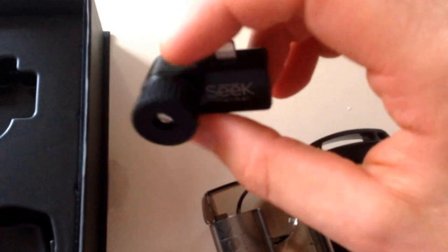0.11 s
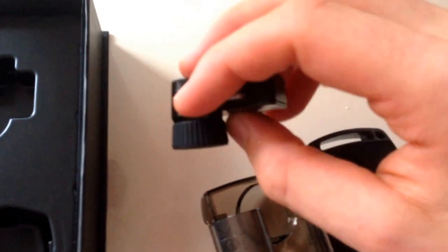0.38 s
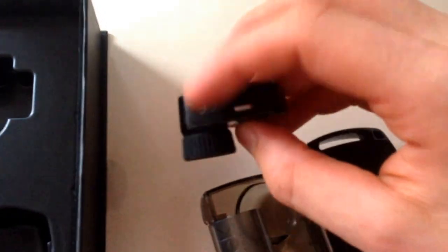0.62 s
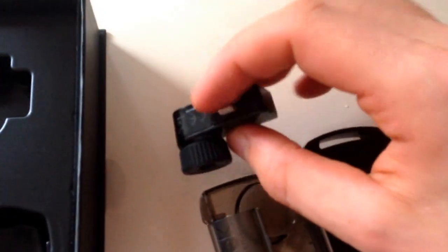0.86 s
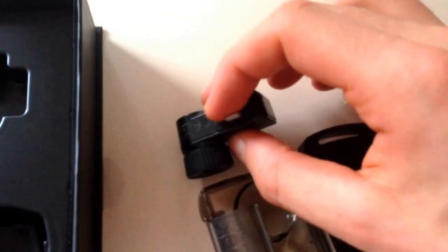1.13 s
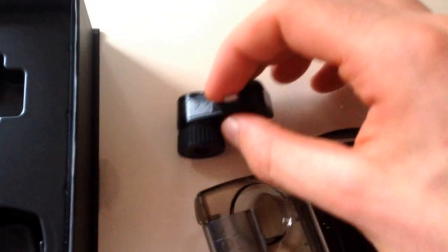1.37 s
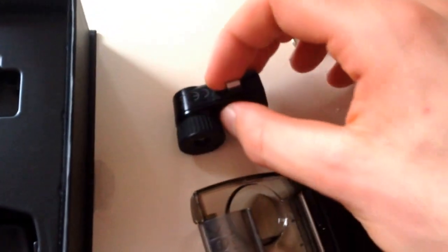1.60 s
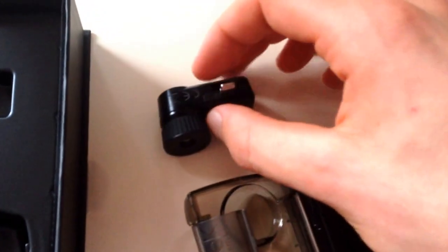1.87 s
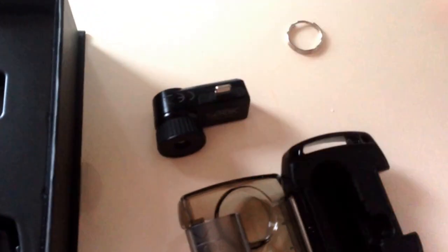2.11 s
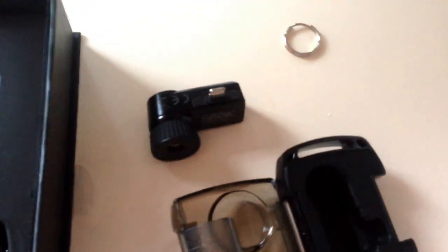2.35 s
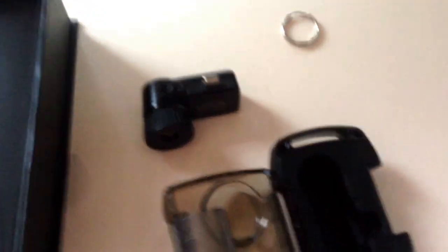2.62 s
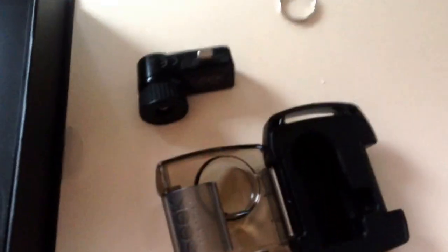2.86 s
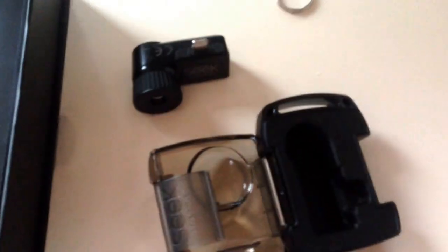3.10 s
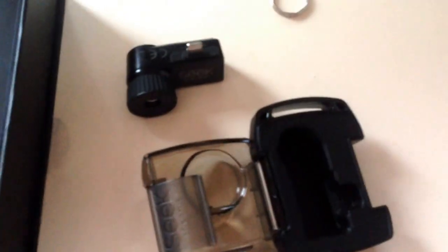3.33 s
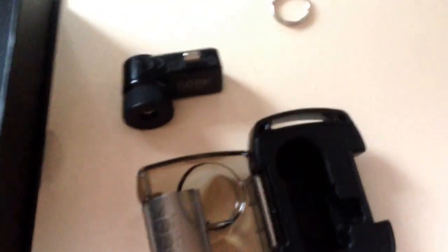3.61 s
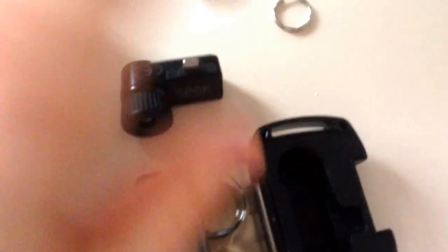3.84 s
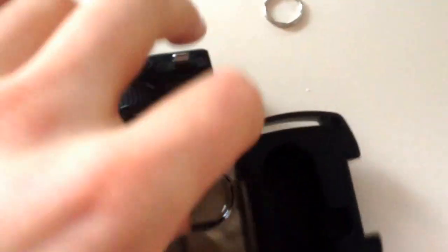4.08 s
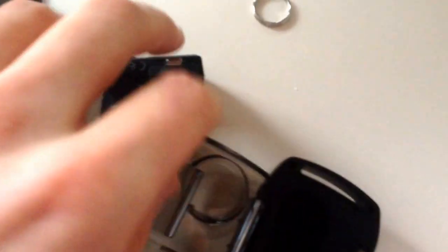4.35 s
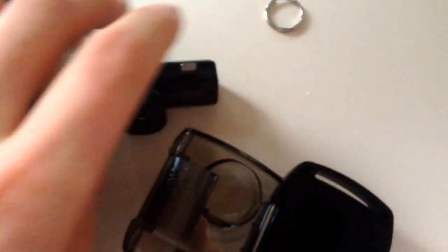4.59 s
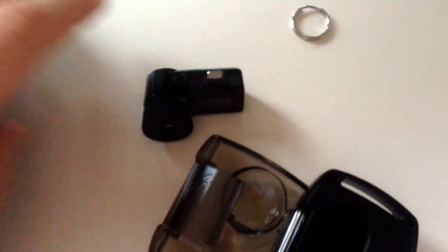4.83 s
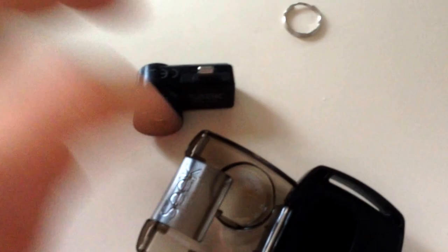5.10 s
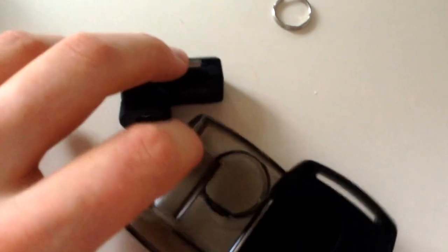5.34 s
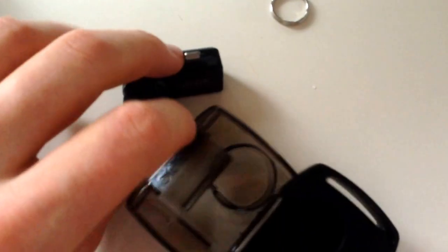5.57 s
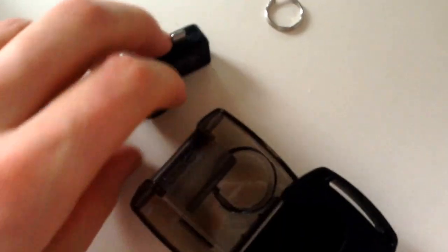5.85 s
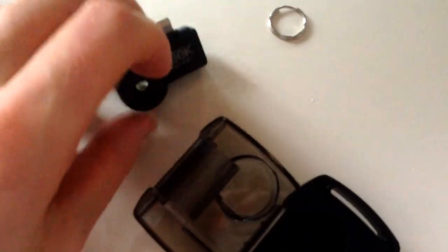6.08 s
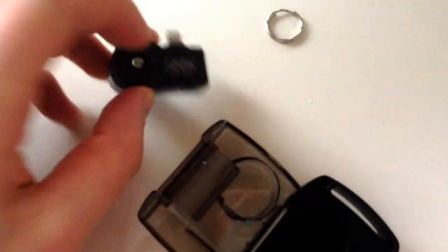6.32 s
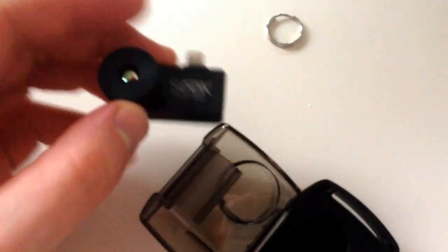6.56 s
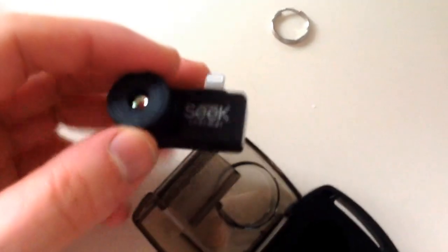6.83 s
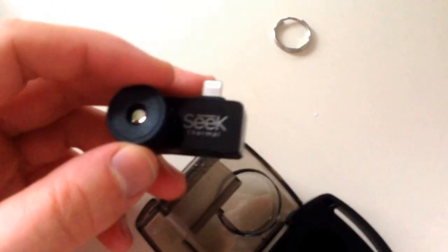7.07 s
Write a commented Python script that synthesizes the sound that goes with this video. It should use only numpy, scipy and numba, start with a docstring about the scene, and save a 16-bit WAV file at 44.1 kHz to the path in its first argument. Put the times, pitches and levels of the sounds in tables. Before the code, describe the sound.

A close phone microphone in a small room picks up a faint, wavering low hum around 200 Hz, soft rumble and steady hiss throughout. After a barely audible tap at 0.1 s, a small hard plastic gadget meets the table: clicks at about 1.15 and 1.3 s, a lighter one at 1.5, then the loudest clack with quick chatter at 1.83 s. Near silence follows, with dull low handling bumps around 2.7 to 3.1 s and faint ticks near 3.1, 3.5 and 3.8 s. From 4.17 to 4.4 s an open plastic case is knocked in a bright, rapid clatter while the hum briefly swells. A hand brushes the tabletop softly, strongest near 5.0 s. Taps resume at 5.3, with sharp clacks at 5.5 and 5.66 s and a rattle at 5.72 s. Small, hollow scrapes and rattles come near 5.9, 6.17 and 6.35 s, then only hum and hiss remain.

```python
"""A low hum wavers over rumble and the hiss of a phone microphone in a small room.
Fingers tap a small plastic gadget down on a table: each blow and its chatter excite damped modes.
Faint ticks are single damped rings, rattles excite one pitch, dragged parts slip and stick as jolts through
resonances, and the hand holding the phone thumps. Then an open plastic case is knocked, a hand brushes
the table as coloured noise, and the gadget is picked up with more taps, rattles and drags."""
import sys
import numpy as np
from scipy import signal
from scipy.fft import rfft, irfft, next_fast_len
from scipy.io import wavfile
from scipy.ndimage import uniform_filter1d
from numba import njit

SR = 44100
rng = np.random.default_rng(int(sys.argv[2]) if len(sys.argv) > 2 else 0)


def convert_level_to_amplitude(level_db):
    """Map a level in decibels to its linear amplitude factor."""
    exponent = np.asarray(level_db, float) / 20
    return 10 ** exponent


def dump(signal):
    """Clip the signal to [-1, 1] and save it as 16-bit WAV at the path in sys.argv[1]."""
    limited = np.clip(np.atleast_2d(signal).T, -1, 1)
    pcm = np.round(limited * 32767).astype(np.int16)
    wavfile.write(sys.argv[1], SR, pcm)


N = 317335
TIME = np.arange(N) / SR  # s

# wavering tone: time_s, mean_pitch_hz, mean_level_db
HUM = [(0.0, 195.3, -73), (0.12, 199.1, -79.5), (0.301, 197.9, -58), (1.138, 201, -57), (1.456, 213.3, -62),
       (2.04, 222, -66.5), (2.8, 209.1, -60.5), (2.9, 208.6, -76.5), (3.248, 203.5, -68.5),
       (3.32, 197.2, -63.5), (4.35, 199, -48.5), (4.43, 196.4, -62), (4.5, 198.1, -56.5),
       (5.829, 198, -57.5), (6.391, 200.4, -62.5), (6.469, 203.8, -67), (6.902, 198.7, -73.5),
       (6.999, 201.6, -59)]
# swell of the low rumble: time_s, level_db
RUMBLE = [(0.0, -65), (0.7, -62), (1.9, -58.5), (2.8, -61), (2.95, -66.5), (3.8, -61.5), (6.7, -61.5),
          (7.2, -65)]
# spectrum of the rumble: frequency_hz, relative_level_db
RUMBLE_COLOUR = [(25, -29), (60, -15), (95, -21), (130, 4.5), (155, -6), (178, 4.5), (200, 3), (230, -6.5),
                 (275, -5.5), (320, -10.5), (380, -19), (600, -23.5), (900, -41)]
# spectrum of the microphone hiss: frequency_hz, relative_level_db
HISS_COLOUR = [(240, -33), (400, -3.5), (511, -6), (914, -10.5), (1120, -12.5), (1590, -10), (2840, -13),
               (3210, -11), (13700, -14), (15500, -14.5)]
# bumps through the hand that holds the phone: centre_s, peak_db, pitch_hz
THUMPS = [(2.69, -62, 45.23), (2.9, -62, 59.7), (2.98, -58, 55), (3.12, -54.5, 63.8), (3.5, -67, 60),
          (5.511, -57.5, 64.4), (6.369, -64, 50)]
# blows of the gadget: start_s, shell_peak_db, table_peak_db, edge_peak_db, chatter_ms
TAPS = [(0.138, -49, -65, -54, 5.9), (1.057, -78, -74, -44.5, 11.4), (1.155, -42.5, -45, -67, 15),
        (1.1703, -28.5, -24, -43, 6.4), (1.3045, -21, -26.5, -60, 3.6), (1.333, -40, -67, -71, 9.8),
        (1.5152, -34.5, -31.5, -50, 10), (1.595, -47.5, -51, -76, 8.7), (1.64, -50, -48, -78, 14),
        (1.779, -57, -78, -66, 7.5), (1.83, -14.5, -25.5, -22.5, 10.9), (1.8535, -22, -34.5, -41, 11.3),
        (1.8675, -24.5, -31.5, -32, 9.2), (1.883, -35, -44, -49.5, 20), (3.497, -42.5, -56, -39.5, 9.2),
        (3.841, -50.5, -71, -45.5, 9.3), (4.657, -53.5, -49, -52.5, 11), (5.312, -48.5, -54, -38.5, 7.6),
        (5.355, -50, -52, -66, 20), (5.38, -31.5, -38, -41, 5.5), (5.455, -55, -61, -53.5, 12),
        (5.5073, -15.5, -22, -60, 5.5), (5.5295, -36, -43, -28.5, 6), (5.6595, -16.5, -24, -66, 4.7),
        (5.668, -27, -36, -35.5, 7.9), (5.721, -34, -30, -35, 15), (5.841, -52, -51, -85, 9),
        (6.132, -59, -50, -77, 6.1)]
# blows of the case: start_s, shell_peak_db, table_peak_db, edge_peak_db, chatter_ms
KNOCKS = [(4.109, -56.5, -73, -54, 13), (4.1741, -37, -83, -49, 3.1), (4.2115, -14.5, -29.5, -12.5, 4.4),
          (4.3078, -26, -34.5, -35.5, 23), (4.3278, -14.5, -17.5, -25.5, 9.7), (4.3635, -26, -21, -38, 4.5),
          (4.3658, -19, -45, -21.5, 8.8), (4.3735, -22, -25, -47, 10), (4.4065, -38.5, -39.5, -31, 5.2)]
# nominal modes of the table top: pitch_hz, level_db, longest_t60_s
TABLE_RING = [(336, -10, 0.11), (423, -2, 0.1), (617, 6, 0.07), (714, -4, 0.011), (940, 13, 0.066),
              (1042, 28.5, 0.019), (1225, 19, 0.021), (1350, 15.5, 0.013)]
# nominal modes of the gadget, shell then edges: pitch_hz, level_db, longest_t60_s
GADGET_RING = [(1640, 7, 0.005), (1905, -3.5, 0.036), (2100, 8, 0.0063), (2490, 10, 0.0107),
               (2810, 13.5, 0.013), (3160, 9, 0.01), (3580, 5, 0.006), (4401, 15, 0.005),
               (5100, 7.5, 0.0087), (5790, 13, 0.00292), (5910, 13, 0.002), (6810, 4, 0.0045),
               (7530, 10, 0.006), (8110, 17, 0.0013), (9400, -8, 0.0034), (11400, 17.5, 0.00089),
               (13620, -3.5, .002)]
# nominal modes of the case, shell then edges: pitch_hz, level_db, longest_t60_s
CASE_RING = [(1560, -6, 0.0097), (2415, 0, 0.02), (2980, -18, 0.0073), (3106, 8, .025),
             (3420, 16.5, 0.0047), (3900, -3, 0.0088), (4330, 8, 0.0074), (4980, 8, .008), (5800, -6, .006),
             (6800, -4, 0.0061), (7200, 8, 0.0061), (8150, 8, .005), (9400, 6, 0.004), (10800, 12, 0.0018),
             (13250, -10.5, .002)]
# push of a contact, softer on heavier bodies: table_ms, shell_ms, edges_ms
CONTACT_MS = (0.46, 0.25, 0.043)
# dry crack of the contact beside the modes: table_db, shell_db, edges_db
CRACK_DB = (43, 29, 22)
# below these each body is too small to radiate: table_contact_patch_hz, shell_hz, edges_hz
RADIATES_HZ = (305.3, 1300., 3920)
# faint ticks of one clear pitch: start_s, level_db, pitch_hz, t60_s
TICKS = [(.474, -57.5, 1040, 0.018), (3.104, -61, 784, 0.036), (3.167, -52.5, 860, 0.033),
         (3.255, -61, 570, 0.073), (3.255, -63.5, 1910, 0.097), (3.498, -42.5, 877, 0.042),
         (3.505, -45, 2480, 0.063), (3.508, -49, 835, 0.015), (3.509, -41.5, 5060, 0.019),
         (3.783, -56, 580, 0.059), (3.797, -62, 1330, 0.056), (4.01, -59.5, 1100, 0.057),
         (4.083, -58.5, 3580, .03), (4.655, -51, 686, 0.043)]
# a loose part buzzing on one pitch: start_s, peak_db, edge_peak_db, pitch_hz, length_ms
RATTLES = [(1.158, -41.5, -40.5, 3320, 6.3), (1.177, -29, -40, 2410, 4.4), (1.1798, -30, -33.5, 3000, 7.1),
           (1.5199, -27, -35, 3360, 3.7), (1.5222, -29, -33.5, 2220, 4.6), (1.807, -43.5, -77, 942, 3.3),
           (1.83, -39, -22.5, 1816, 3.86), (1.855, -29.5, -28.5, 1770, 4.4), (4.176, -42, -78, 3300, 12),
           (4.2108, -14.5, -38, 3300, 1.1), (4.2124, -19.5, -31, 2300, 2.0), (4.222, -38, -50, 1030, 21),
           (4.3096, -24.5, -52, 3256, 20.6), (4.3665, -18.5, -32, 3320, 5.4),
           (4.372, -23.5, -19.5, 2370, 7.5), (4.381, -31, -30.5, 3095, 4.1), (4.406, -36.5, -55, 1800, 3.3),
           (4.406, -27.5, -49, 3120, 4), (4.993, -41, -41, 737, 6.6), (5.51, -34.5, -39, 1350, 10),
           (5.511, -27, -32, 2920, 14), (5.725, -25, -35, 2440, 3.4), (5.729, -24, -25.5, 3030, 11),
           (5.869, -45, -63, 1580, 11), (6.164, -32.5, -61, 1065, 9.4), (6.165, -53, -58, 2800, 9.9),
           (6.179, -36.5, -58, 994, 5), (6.187, -39.5, -57, 1210, 5.9), (6.324, -44, -70, 1091, 26),
           (6.351, -40, -65, 1720, 25), (6.363, -36, -59, 1040, 8.4), (6.368, -40.5, -59, 2180, 22)]
# parts dragged on the table: firmest_contact_s, level_db, shell_level_db (relative), hollow_hz, fade_db_per_s
DRAGS = [(1.54, -73, -10, 950, 450), (1.61, -69.5, -25, 1300, 27), (1.78, -57, -14, 990, 66),
         (5.39, -62, -15, 940, 170), (5.76, -62, -28, 1230, 84), (5.881, -51, -12, 1480, 214),
         (6.177, -43, -23, 1120, 225), (6.34, -73, 4, 1108, 109), (6.368, -45, -3.5, 1100, 374)]
# hand brushing the table: time_s, mean_level_db
BRUSH = [(4.62, -69), (4.66, -69), (4.684, -74.5), (4.768, -61.5), (5.012, -53.5), (5.122, -71.5),
         (5.14, -93)]
# spectrum of the brushing: frequency_hz, relative_level_db
BRUSH_COLOUR = [(240, -46), (400, -11.5), (584, -3.5), (841, -7), (1410, -7), (1570, -11.5), (2060, -9),
                (2320, -15), (4070, -9.5), (15000, -25)]

HISS_DB, TOP_HZ = -67.5, 15700
THUMP_S, SHAKE_DB = 0.011, -84
SHELL_HZ, EDGE_HZ = 1450, 4400  # modes from here up belong to the shell, then to the edges
CHATTER_DB, CHATTER_DB_PER_MS = -32, 0.89  # the looser the part, the longer and stronger its chatter
RATTLE_CYCLES = 25  # to fall by 60 dB
DRAG_RISE_DB_PER_S = 589
HALO_HZ, HALO_WIDTH_HZ, HALO_DB, HALO_S = 2850, 390, -10.5, 0.0076


def curve(rows):
    """Linear interpolation of table columns over time; as good as silent (-150 dB) outside their span."""
    s, *columns = np.transpose(rows)
    return [np.interp(TIME, s, c, left=-150, right=-150) for c in columns]


def unit(x):
    """Normalisation to an rms of 1."""
    return x / np.sqrt(np.mean(x ** 2))


def noise(colour):
    """Spectral shaping: white noise weighted by (Hz, dB) points on a log-frequency axis, rms 1."""
    hz, db = np.transpose(colour)
    bins = np.fft.rfftfreq(N, 1 / SR) + 1
    gain = convert_level_to_amplitude(np.interp(np.log(bins), np.log(hz), db))
    return unit(irfft(rfft(rng.standard_normal(N)) * gain, N))


def walk(rate_hz):
    """Slow random fluctuation: noise averaged twice over 1 / rate_hz, rms 1."""
    k = int(SR / rate_hz)
    return unit(uniform_filter1d(uniform_filter1d(rng.standard_normal(N), k), k))


def grit(size, spread_db):
    """Impulsive excitation: tiny impacts of uneven but bounded size."""
    return rng.standard_normal(size) * convert_level_to_amplitude(spread_db * np.minimum(rng.exponential(size=size), 4))


def add(out, s, parts, peaks_db):
    """Superposition: the bodies enter at time s, each brought to its own peak level."""
    gains = convert_level_to_amplitude(peaks_db)[:, None] / np.abs(parts).max(axis=1, keepdims=True)
    sound = (parts * gains).sum(axis=0)
    start = int(s * SR)
    out[start:start + len(sound)] += sound


def hum():
    """Frequency and amplitude modulation: random wander gives a sinusoid its waver and rough skirt."""
    s, hz, db = np.transpose(HUM)
    pitch = np.interp(TIME, s, hz) + 1.52 * walk(8.1)
    phase = 2 * np.pi * np.cumsum(pitch) / SR
    level_db = np.interp(TIME, s, db) + 1.9 * walk(41) + 2.06 * walk(6.2)
    return np.sqrt(2) * convert_level_to_amplitude(level_db) * np.sin(phase)


def rumble():
    """Low-frequency coloured noise under a slow level envelope."""
    return convert_level_to_amplitude(curve(RUMBLE)[0]) * noise(RUMBLE_COLOUR)


def hiss():
    """Stationary coloured noise of the microphone."""
    return convert_level_to_amplitude(HISS_DB) * noise(HISS_COLOUR)


def thumps():
    """Structure-borne motion: Gaussian bumps of one or two cycles over the fluctuating shake of the hand."""
    bumps = sum(convert_level_to_amplitude(db) * np.exp(-((TIME - s) / THUMP_S) ** 2) * np.cos(2 * np.pi * hz * (TIME - s))
                for s, db, hz in THUMPS)
    shake = noise([(20, -11.5), (45, -6.5), (70, 1.0), (100, -1.5), (150, -62.0)])
    return bumps + convert_level_to_amplitude(SHAKE_DB + 6.7 * walk(3.3)) * shake


def rings(part, size=4096):
    """Modal responses of table, shell and edges; spot and grip shift each mode's share and pitch."""
    hz, db, t60 = np.transpose(TABLE_RING + part)[:, :, None]
    t = np.arange(size) / SR
    spot, grip = rng.standard_normal((2, len(hz), 1))
    gain, pitch = convert_level_to_amplitude(db + 2.5 * spot), hz * (1 + .015 * grip)
    # plastic and laminate damp strongly: a mode falls by 60 dB within about 28 cycles
    decay = 1000 ** (-t / np.minimum(t60, 28 / hz))
    modes = gain * np.sin(2 * np.pi * pitch * t) * decay
    body = np.digitize(hz[:, 0], [SHELL_HZ, EDGE_HZ])
    responses = []
    for k in range(3):
        push = np.sin(np.pi * np.minimum((t[:64] * 1000 + .01) / CONTACT_MS[k], 1)) ** 2
        impulse = modes[body == k].sum(axis=0) + convert_level_to_amplitude(CRACK_DB[k]) * (t == 0)
        pushed = np.convolve(impulse, push)[:size]
        radiation = signal.butter(3, RADIATES_HZ[k], "high", fs=SR, output="sos")
        responses.append(signal.sosfilt(radiation, pushed))
    return np.array(responses)


def blows(rows, part):
    """Impact excitation: a first blow, then a dying chatter of contacts, convolved with the three bodies."""
    out = np.zeros(N + 8192)
    t_ms = np.arange(4096) / SR * 1000
    for s, shell_db, table_db, edge_db, chatter_ms in rows:
        chatter_db = CHATTER_DB + CHATTER_DB_PER_MS * chatter_ms
        decay = np.exp(-(t_ms / max(chatter_ms, .3)) ** 0.83)
        chatter = convert_level_to_amplitude(chatter_db) * grit(size=4096, spread_db=3.5) * decay
        force = np.tile(chatter, (3, 1))
        force[:, 0] = 1  # the first blow
        add(out, s, signal.fftconvolve(rings(part), force, axes=1), [table_db, shell_db, edge_db])
    return out[:N]


def taps():
    """Impact of the gadget on the table, exciting the modes of both."""
    return blows(TAPS, GADGET_RING)


def ticks():
    """Free decay: each tick is a single damped sinusoid with a soft onset."""
    out = np.zeros(N)
    t = np.arange(8192) / SR
    onset = 1 - np.exp(-t / 0.00019)
    for s, level_db, hz, t60 in TICKS:
        start = int(s * SR)
        ring = np.sin(2 * np.pi * hz * t) * 1000 ** (-t / t60)
        out[start:start + len(t)] += convert_level_to_amplitude(level_db) * ring * onset
    return out


def rattles():
    """Repeated impact: small contacts swell and die, exciting one pitch and the edges."""
    out = np.zeros(N + 8192)
    t = np.arange(4096) / SR
    for s, peak_db, edge_db, hz, length_ms in RATTLES:
        age = t * 1000 / length_ms
        force = grit(size=4096, spread_db=5.0) * age ** 0.1 * np.exp(-age ** 2)
        ring = np.sin(2 * np.pi * hz * t) * 1000 ** (-t * hz / RATTLE_CYCLES)
        ring = signal.sosfilt(signal.butter(2, hz / 2, "high", fs=SR, output="sos"), ring)
        bodies = np.array([ring, rings(GADGET_RING)[2]])
        add(out, s, signal.fftconvolve(bodies, force[None], axes=1), [peak_db, edge_db])
    return out[:N]


@njit
def resonance(x, hz, sharpness):
    """Second-order resonance: a state-variable band-pass."""
    y, band, low = np.empty(len(x)), 0., 0.
    g = np.tan(np.pi * hz / SR)
    for i in range(len(x)):
        v = (band + g * (x[i] - low)) / (1 + g * (g + 1 / sharpness))
        band, low, y[i] = 2 * v - band, low + 2 * g * v, v
    return y


def drags():
    """Stick-slip friction: uneven bursts of jolts excite the hollow under the part and its shell."""
    out = np.zeros(N)
    jolts = grit(size=N, spread_db=3.0) * convert_level_to_amplitude(2.8 * walk(110))
    shell = unit(signal.fftconvolve(jolts, rings(GADGET_RING)[1])[:N])
    for s, level_db, shell_db, hz, fade_db in DRAGS:
        hollow = unit(resonance(resonance(jolts, 1. * hz, 2.4), 1. * hz, 1.6))
        drop_db = np.where(TIME < s, DRAG_RISE_DB_PER_S, fade_db) * np.abs(TIME - s)
        out += convert_level_to_amplitude(level_db - drop_db) * (hollow + convert_level_to_amplitude(shell_db) * shell)
    return out


def knocks():
    """Impact of the open case, exciting its modes and those of the table."""
    return blows(KNOCKS, CASE_RING)


def brush():
    """Sliding friction of skin on the smooth top: coloured noise with a flickering level."""
    level_db = curve(BRUSH)[0] + 1.1 * walk(57) + 0.66 * walk(400)
    return convert_level_to_amplitude(level_db) * noise(BRUSH_COLOUR)


def room(x, t60_low=0.22, t60_high=0.028, split_hz=820.0, wet_db=-20, blur_hz=830.0):
    """Diffuse reverberation whose treble dies first; pitches blur in it as hands and parts move."""
    t = np.arange(SR // 2) / SR
    analytic = signal.hilbert(x, next_fast_len(N))[:N]
    blurred = np.real(analytic * np.exp(1.5j * walk(blur_hz)))
    air = signal.sosfilt(signal.butter(2, 300, "high", fs=SR, output="sos"), rng.standard_normal(len(t)))
    low = signal.sosfilt(signal.butter(1, split_hz, fs=SR, output="sos"), air)
    tail = low * 1000 ** (-t / t60_low) + (air - low) * 1000 ** (-t / t60_high)
    tail *= 1 - np.exp(-t / 0.0033)  # gradual build-up
    tail /= np.sqrt(np.sum(tail ** 2))
    return x + convert_level_to_amplitude(wet_db) * signal.fftconvolve(blurred, tail)[:N]


def halo(x):
    """Anticausal dispersion: a band near 3 kHz smears ahead, a short rough halo before each click."""
    edges = [HALO_HZ - HALO_WIDTH_HZ / 2, HALO_HZ + HALO_WIDTH_HZ / 2]
    band = signal.butter(3, edges, "band", fs=SR, output="sos")
    t = np.arange(-1024, 1025) / SR
    smear = rng.standard_normal(len(t)) * np.exp(-(t / HALO_S) ** 2) * (t < 0)
    smear = smear[None] / np.linalg.norm(smear)
    return x + convert_level_to_amplitude(HALO_DB) * signal.sosfiltfilt(band, signal.fftconvolve(x, smear, "same"))


def scene():
    """Superposition: handling reverberates in the room; hum, rumble, thumps and brushing stay dry."""
    handling = taps() + ticks() + rattles() + drags() + knocks()
    return (hum() + rumble() + thumps() + room(handling) + brush())[None]


def roll_off(x):
    """The treble ends steeply here."""
    return signal.sosfilt(signal.butter(12, 15350, fs=SR, output="sos"), x)


def record(dry):
    """Band limiting: the microphone adds its hiss to the haloed sound and the phone cuts the top."""
    top = signal.butter(10, TOP_HZ, fs=SR, output="sos")
    mix = signal.sosfilt(top, halo(dry) + hiss())
    return roll_off(mix)


dry = scene()
out = record(dry)
dump(out)
```